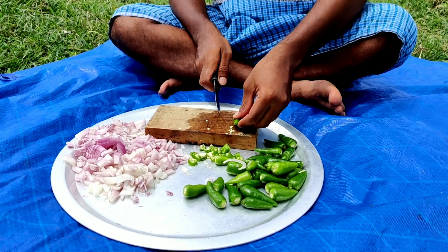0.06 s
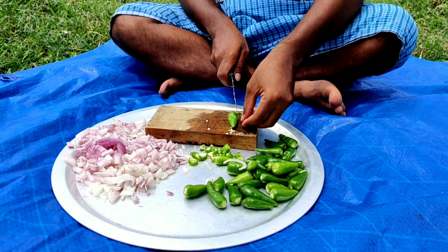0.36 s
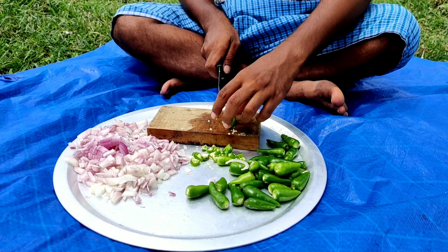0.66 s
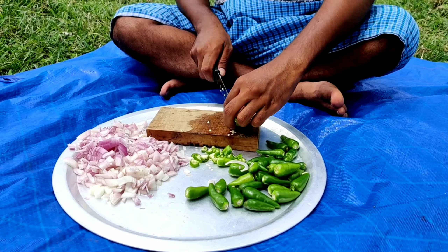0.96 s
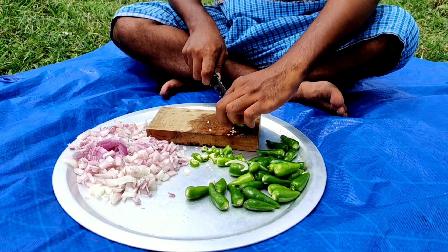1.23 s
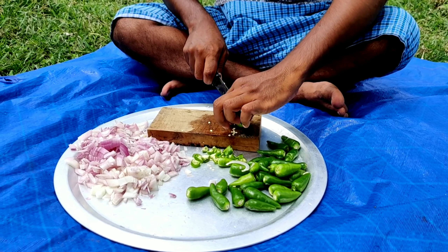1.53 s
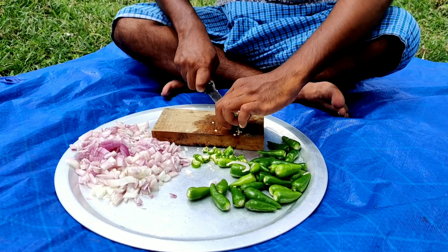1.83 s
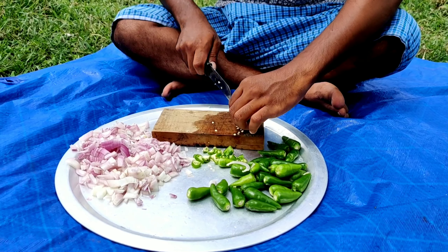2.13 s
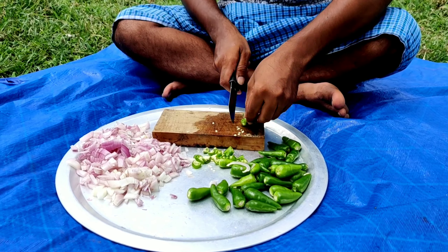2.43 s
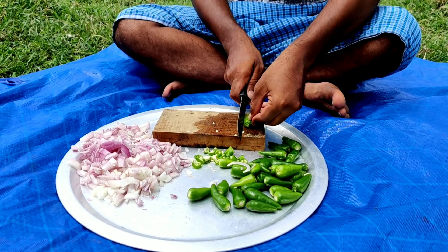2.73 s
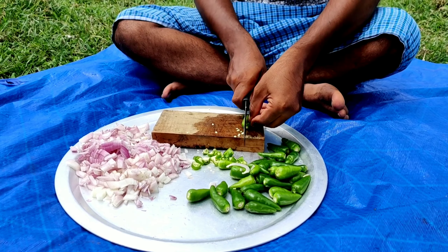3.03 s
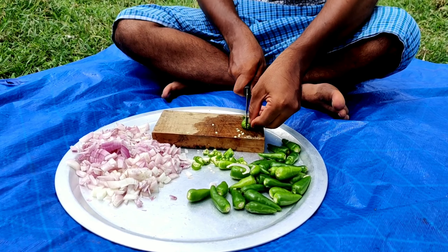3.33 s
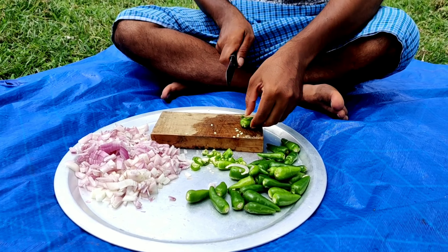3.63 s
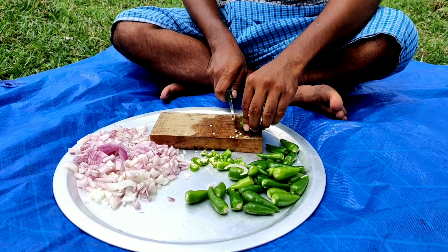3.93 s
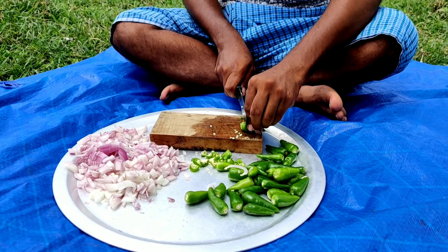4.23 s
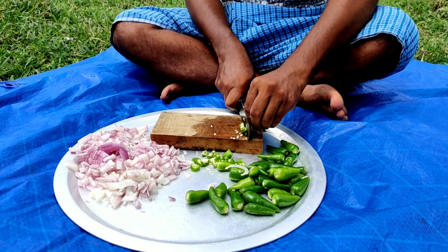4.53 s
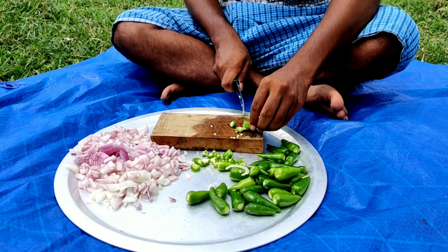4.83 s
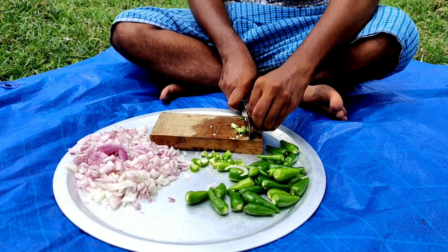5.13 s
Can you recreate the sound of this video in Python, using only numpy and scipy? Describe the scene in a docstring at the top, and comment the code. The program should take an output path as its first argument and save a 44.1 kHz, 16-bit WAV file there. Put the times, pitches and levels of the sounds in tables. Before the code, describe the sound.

Close to the microphone, a knife knocks on a wooden board a handful of times at an uneven pace. Early on, a crow off to the left caws twice, harshly, the second call softer. Then come short, crisp crunches and snaps as the blade cuts through chillies. Small birds whistle faintly in the distance, and gusts of wind rumble on the microphone over a soft outdoor hiss.

```python
"""A knife cuts green chillies on a wooden board, close to the microphone, out on a lawn.
The edge crunches through skin and flesh, and each knock on the wood rings board and blade.
Off to the left a crow caws twice, its pitch kicking fast into a harsh rattle; small birds whistle
farther off. Wind buffets the two microphone ports over a soft hiss of leaves and insects."""
import sys
import numpy as np
from scipy import signal
from scipy.fft import rfft, irfft, next_fast_len
from scipy.io import wavfile
from scipy.ndimage import uniform_filter1d, map_coordinates

SR = 44100
rng = np.random.default_rng(int(sys.argv[2]) if len(sys.argv) > 2 else 0)


def put_to_file(sound):
    """Save the sound as 16-bit audio at rate SR, in the file named by the first command-line argument."""
    columns = np.atleast_2d(sound).T  # one column per channel
    safe = np.clip(columns, -1, 1)
    whole_steps = np.round(safe * 32767)
    wavfile.write(sys.argv[1], SR, whole_steps.astype(np.int16))


N = 236800

# knife meets board, relative levels: (time [s], low knock [dB], middle [dB], high ring [dB], tick [dB])
KNOCKS = [(0.1756, -25, -36.5, -37, -37.5), (1.775, -19.5, -25, -20.5, -39.5), (2.672, -35, -55, -55, -59),
          (3.2626, -23.5, -33, -44, -56), (3.8663, -26.5, -38.5, -19.5, -31.5)]
# modes of board and blade: (frequency [Hz], relative level [dB], t60 [s])
BOARD_MODES = [(429, -1, 0.035), (596, 0, 0.025), (790, -1.5, 0.029), (1000, -14.5, 0.058),
               (1200, -7, 0.0064), (1460, 0, 0.055), (1680, 2, 0.019), (2265, -3, 0.038),
               (2920, -12, 0.031), (3210, -10.5, 0.025), (5370, -2.5, 0.024), (7360, -2, 0.0068)]
# the board as the microphone hears it: (frequency [Hz], left minus right [dB])
BOARD_BALANCE = [(400, 2.5), (2300, 6), (4500, 8), (8000, -8.5), (14000, 0.5)]
# blade going through a pod: (time [s], length [s], skin crackle [dB], flesh crunch [dB])
STROKES = [(3.218, 0.059, -47, -56), (3.328, 0.074, -53.5, -48), (3.384, 0.058, -48.5, -67),
           (4.401, 0.072, -45, -42), (4.537, 0.11, -50.5, -56.5), (5.156, 0.058, -43.5, -46.5),
           (5.29, 0.09, -46.5, -60)]
# skin snapping under the edge: (time [s], crack [dB], pop of the flesh [dB])
SKIN_SNAPS = [(1.538, -37.5, -42.5), (3.121, -41.5, -45), (3.411, -33, -57), (3.421, -33.5, -58),
              (3.513, -41.5, -60), (4.4077, -33, -37), (4.457, -37, -30.5), (5.168, -29.5, -31),
              (5.1835, -25.5, -29), (5.197, -30, -39), (5.212, -44, -33.5)]
# spectra of crackling skin, crunching flesh and a snap: (frequency [Hz], relative density [dB])
SKIN_SPECTRUM = [(1180, -1), (2000, 0), (2720, -6), (3870, -0.5), (5840, -2), (8010, -7), (8730, -9.5),
                 (15500, -5.5)]
FLESH_SPECTRUM = [(200, -54), (400, 1.5), (650, 0.5), (1300, -4.5), (2000, -14), (3500, -38)]
SNAP_SPECTRUM = [(800, -25), (4500, 5), (9000, -7.5), (15000, -1.5)]
# caws: (time [s], length [s], voice [dB], rasp [dB], fade [dB], pitch fall [Hz], fall lateness [power],
# kick briefness [power], beak opening [dB], beak closing [dB], left port lag [s])
CROW_CALLS = [(.858, .372, -20, -35.5, 3, 214.5, 4.6, 1.3, -13.5, 2, 0.000294),
              (2.246, .47, -28.5, -43, 5, 141.2, 2.4, 3.1, -0.5, 22, 0.00032)]
# resonances of the crow's throat and of its high rasp: (frequency [Hz], relative gain [dB])
THROAT_RESPONSE = [(550, -52), (850, -13), (1100, -5.5), (1270, 0.5), (1430, -7.5), (1690, 11.5),
                   (1920, 14), (2210, 11), (2400, 3.5), (2600, -13), (3000, -24), (3600, -70)]
RASP_RESPONSE = [(2200, -53), (2900, -5), (3600, -2.5), (3950, -5), (4380, 7), (4900, 10), (5600, -1),
                 (6300, -3.5), (7400, -4.5), (8200, -5), (10000, -18), (13000, -28)]
# the crow, off to the left: (frequency [Hz], left minus right [dB])
CROW_BALANCE = [(700, -21), (1300, 8), (2400, 2.5), (4400, 4), (8000, -11)]
# rising whistles of a small bird: (time [s], pitch [Hz], level [dB])
RISING_WHISTLES = [(0.286, 3106, -36.5), (4.657, 3113, -33.5)]
# glide of a rising whistle: (time [share of length], pitch [ratio])
RISE_SHAPE = [(0, .77), (0.448, .985), (.8, 1.09), (1, 0.84)]
# high falling whistles: (time [s], length [s], starting pitch [Hz], level [dB])
FALLING_WHISTLES = [(.74, .048, 7200, -52), (1.939, 0.049, 7900, -50.5), (3.028, 0.049, 7000, -56),
                    (3.794, 0.083, 6850, -49.5)]
# far twittering on one note: (time [s], length [s], pitch [Hz], level [dB], warble [share of pitch])
FAR_TWITTERS = [(-.02, 0.03, 3170, -35, .027), (1.38, 0.14, 3500, -52, 0.11),
                (1.977, 0.17, 3280, -50.5, 0.074), (3.518, 0.065, 4760, -46, .035),
                (4.697, 0.87, 3060, -54.5, .022), (4.749, 0.11, 4490, -49, 0.027)]
# buffeting of each port: (time [s], relative level [dB])
LEFT_BUFFETING = [(0, -32.5), (.42, -29), (.85, -21.5), (1.37, -21.5), (1.56, -37), (1.71, -23), (2.0, -38),
                  (2.65, -41), (3.6, -47), (4.38, -42), (4.68, -36), (5.37, -35.5)]
RIGHT_BUFFETING = [(0, -26.5), (.22, -28), (.38, -32), (.58, -13), (.7, -10), (.76, -26), (1.7, -35),
                   (1.85, -48), (2.55, -40.5), (3.2, -50.5), (4.05, -43.5), (4.42, -39.5), (4.54, -21.5),
                   (4.79, -24.5), (4.86, -38.5), (4.96, -18.5), (5.2, -24), (5.37, -36)]
# deep rumble and brighter flutter at a port: (frequency [Hz], relative density [dB])
RUMBLE_SPECTRUM = [(11, 8.5), (18, 1.5), (61, 3.5), (151, -11.5), (259, -35.5), (442, -34), (601, -46),
                   (648, -46), (700, -41), (910, -78), (1540, -120)]
FLUTTER_SPECTRUM = [(60, 0), (190, 13.5), (400, -9.5), (700, -31), (2000, -44), (6000, -60)]
# strong gusts break into eddies on the right port: (time [s], level [dB], half width [s])
RIGHT_EDDIES = [(0.506, -9, 0.0021), (0.532, -19.5, 0.00047), (0.576, -3.5, 0.002), (0.6646, -7.5, 0.0011),
                (.674, -7.5, 0.001), (.685, -3.5, 0.0026), (0.6935, -9.5, 0.00092), (.705, -9, 0.0021),
                (0.709, 1.5, 0.0011), (4.697, -13.5, .0018)]
# ambience of the lawn: (time [s], relative level [dB])
AMBIENCE_LEVEL = [(0.0, -55), (0.66, -55), (1.05, -52.5), (1.2, -54.5), (2.68, -55), (2.81, -56.5),
                  (4.4, -58), (4.56, -54), (5.37, -53.5)]
# its spectrum: (frequency [Hz], relative density [dB])
AMBIENCE_SPECTRUM = [(18, -41), (30, 1.5), (97, -4.5), (130, -5.5), (208, -7), (237, -12), (399, -18),
                     (443, -20.5), (656, -25.5), (996, -24), (1080, -24), (1230, -24.5), (3680, -24),
                     (7650, -34), (15500, -36)]
# its likeness at the two ports: (frequency [Hz], correlation [-1 to 1])
AMBIENCE_LIKENESS = [(60, 1), (240, 1), (950, 0.013), (3770, -0.012), (15000, -0.078)]
# its lean to one side: (frequency [Hz], left minus right [dB])
AMBIENCE_BALANCE = [(60, -1.5), (180, 1.5), (550, 2), (1650, 2.0), (4970, 0), (15000, -4.5)]
# its flicker: (frequency [Hz], rms depth [dB])
AMBIENCE_FLICKER = [(500, 0.74), (3500, 2.74), (9000, 0.64)]
# decay of the scatter from trees and walls: (frequency [Hz], t60 [s])
YARD_DECAY = [(300, 0.33), (2000, 0.48), (9000, 0.049)]

CUT_ATTACK_S, CUT_RELEASE_S = 0.011, .014  # the edge bites; the tearing dies away
CAW_TOP_HZ, SCOOP_HZ, SCOOP_S = 589.6, 164.6, .041  # each caw scoops up towards its top pitch
CAW_ATTACK_S, CAW_RELEASE_S, CAW_EDGE_DB = 0.058, 0.027, 27  # the voice starts and ends this far down
FADE_AT, FADE_WIDTH = 0.61, 0.18  # where the voice tires and how gradually, as shares of the call
KICKS_PER_S, RASP_DB_PER_HZ = 79.7, .06  # the rasp weakens as the pitch slackens
BEAK_HZ, BEAK_WIDTH_HZ, BEAK_OPEN_DB = 2120, 135, 7.5  # overtones above this pass while the beak is open
RISE_S, FALL_OCTAVES_PER_S = 0.054, 10  # the small birds' whistles
SWIRLS_PER_S, SWIRL_HALF_WIDTH_S, SWIRL_DB = 14, 0.0027, 4  # lesser eddies on each port
AMBIENCE_GAIN_DB, BAND_LIMIT_HZ = 15.5, 15800


def knife_knocks():
    """Each blow rings the board's modes; where and how the edge lands sets their strengths."""
    out, t = np.zeros(N), np.arange(SR // 5) / SR
    hz, mode_db, t60 = np.transpose(BOARD_MODES)[:, :, None]
    polarity = (-1) ** np.arange(len(hz))[:, None]  # neighbouring modes swing opposite ways
    rattle_band = signal.butter(2, [350, 2200], "band", fs=SR, output="sos")
    for s, low, middle, high, tick in KNOCKS:
        blow_db = along([(650, low), (1500, middle), (2300, high), (3400, tick)], hz)
        strength = amp(mode_db + blow_db + rng.normal(0, 1, hz.shape) + 3.5)
        ring = np.sum(polarity * strength * amp(-60 * t / t60) * np.sin(2 * np.pi * hz * t), axis=0)
        crack = amp(tick - 4 - 60 * t / 0.03) * rng.standard_normal(len(t))
        rattle = unit(signal.sosfilt(rattle_band, rng.standard_normal(len(t))))  # board jars on its tray
        add(out, s, ring + crack + amp(low - 5.5 - 60 * t / 0.041) * rattle)
    return placed(out, BOARD_BALANCE) + amp(-25) * yard(out)


def knife_cuts():
    """The pod's skin crackles and its flesh crunches; now and then the skin snaps and the pod pops."""
    skin, flesh, cracks, pops = np.zeros((4, N))
    for s, length, skin_db, flesh_db in STROKES:
        t = clock() - s
        stroke = np.clip(t / CUT_ATTACK_S, 0, 1) * np.exp(-np.maximum(t - length, 0) / CUT_RELEASE_S)
        skin += amp(skin_db) * stroke
        flesh += amp(flesh_db) * stroke
    t = np.arange(SR // 20) / SR
    for s, crack_db, pop_db in SKIN_SNAPS:
        add(cracks, s, amp(crack_db - 60 * t / 0.019))
        add(pops, s, amp(pop_db - 60 * t / 0.043))
    snaps = cracks * coloured(rng.standard_normal(N), SNAP_SPECTRUM)
    snaps += pops * coloured(rng.standard_normal(N), FLESH_SPECTRUM)
    tearing = unit(amp(3 * wobble(180)))  # the skin gives in small jerks
    crackle = skin * coloured(cell_bursts(rate=4300, spread_db=4.5), SKIN_SPECTRUM)
    scatter = amp(3) * skin * tearing * coloured(rng.standard_normal((2, N)), SKIN_SPECTRUM)
    crunch = flesh * coloured(cell_bursts(rate=990, spread_db=1.5), FLESH_SPECTRUM)
    return placed(crackle + crunch + snaps + scatter, BOARD_BALANCE)


def cell_bursts(rate, spread_db):
    """Cells of uneven size bursting at random, rate a second."""
    clicks = (rng.random(N) < rate / SR) * rng.choice([-1, 1], N)
    return clicks * amp(spread_db * rng.standard_normal(N))


def crow():
    """Off to the left, each caw scoops up, holds, then tires: it fades and its pitch falls ever faster."""
    out = np.zeros((2, N))
    for s, length, voice_db, rasp_db, fade_db, fall_hz, lateness, *timbre, lag in CROW_CALLS:
        t = np.clip(clock() - s, 0, length)
        progress = t / length
        f0 = CAW_TOP_HZ - SCOOP_HZ * np.exp(-(t / SCOOP_S) ** 2) - fall_hz * progress ** lateness
        effort = np.clip(np.minimum(t / CAW_ATTACK_S, (length - t) / CAW_RELEASE_S), 0, 1)
        gate = np.minimum(10 * effort, 1)
        edge_db = CAW_EDGE_DB * (effort - 1)
        tired_db = fade_db * (1 + np.tanh((progress - FADE_AT) / FADE_WIDTH)) / 2
        slack_db = RASP_DB_PER_HZ * (CAW_TOP_HZ - f0)
        call = caw(f0, gate, voice_db + edge_db - tired_db, rasp_db + edge_db / 2 - slack_db, *timbre)
        out += placed(call, CROW_BALANCE, lag) + amp(-22) * yard(call[0])
    return out


def caw(f0, gate, voice_db, rasp_db, briefness, beak_db, closing_db):
    """Quick upward kicks of pitch sweep the overtones across the throat's resonances: a harsh rattle."""
    on = gate > 0
    progress = np.linspace(0, 1, on.sum())
    beat = 2 * np.pi * np.cumsum(KICKS_PER_S * (1 + .03 * wobble(40))) / SR
    kick = np.abs(np.cos(beat / 2)) ** (2 * briefness) * (1 + .15 * wobble(80))
    swing = np.interp(f0, [470, 545], [.015, .135])  # the kicks grow with effort
    pitch = f0 * (1 + swing * (kick - kick.mean()) + .005 * wobble(45) + .003 * wobble(700))
    strength = gate * (1 - .25 * kick) * (1 + .2 * np.sin(beat))  # thins on a kick, swells as it drops
    overtone_hz = np.arange(1, 23)[:, None] * pitch[on]
    overtones = np.cos(2 * np.pi * np.cumsum(overtone_hz, axis=1) / SR)
    resonance_hz = 5700 + 1400 * np.sin(2.5 * progress)  # rises as the beak opens, then sinks
    lift = amp(5 * np.exp(-((overtone_hz - resonance_hz) / 450) ** 2))
    treble = np.clip((overtone_hz - BEAK_HZ) / BEAK_WIDTH_HZ, 0, 1)
    beak_gain = amp((BEAK_OPEN_DB - closing_db * progress ** 3) * treble)
    pulses, bright = np.zeros((2, N))
    pulses[on] = (beak_gain * overtones).sum(axis=0)
    bright[on] = (lift * overtones).sum(axis=0)
    hiss = rng.standard_normal((2, N))
    shaped = lambda source, spectrum: coloured(strength * source, spectrum) * np.sqrt(np.mean(on))
    # an open beak lifts the upper resonance
    throat = [(hz, db + beak_db * np.clip(np.log2(hz / 1700), 0, 1)) for hz, db in THROAT_RESPONSE]
    voice = shaped(pulses, throat) + amp(-19) * shaped(hiss, throat)
    rasp = shaped(bright, RASP_RESPONSE) + amp(-12) * shaped(hiss, RASP_RESPONSE)
    return amp(voice_db) * voice + amp(rasp_db) * rasp


def small_birds():
    """Twitters, rising whistles and falling whistles, blurred by distance."""
    out = sum(whistle(*row) for row in FAR_TWITTERS)
    for s, hz, db in RISING_WHISTLES:
        glide = np.interp((clock() - s) / RISE_S, *np.transpose(RISE_SHAPE))
        out += whistle(s, RISE_S, hz * glide, db, warble=0.014)
    for s, length, hz, db in FALLING_WHISTLES:
        glide = 2 ** (-FALL_OCTAVES_PER_S * np.clip(clock() - s, 0, length))
        out += whistle(s, length, hz * glide, db, warble=.025)
    return out + amp(-7) * yard(out)


def whistle(s, length, hz, db, warble):
    """One thin note that swells and fades, its pitch a little unsteady."""
    swell = np.sin(np.pi * np.clip((clock() - s) / length, 0, 1))
    pitch = hz * (1 + warble * wobble(400))
    return amp(db) * swell * np.sin(2 * np.pi * np.cumsum(pitch) / SR)


def wind_on_microphone():
    """Each port has its own buffeting; strong gusts turn into a brighter flutter and eddies thump."""
    buffet_db = np.array([curve(LEFT_BUFFETING), curve(RIGHT_BUFFETING)])
    gust = amp(buffet_db + 1.74 * np.array([wobble(9), wobble(21)]))
    rumble = gust / np.hypot(1, gust / .13)  # the deep rumble levels off in strong gusts
    out = amp(2.2) * rumble * coloured(rng.standard_normal((2, N)), RUMBLE_SPECTRUM)
    out += amp(2.5) * gust ** 2 * coloured(rng.standard_normal((2, N)), FLUTTER_SPECTRUM)
    swirls = amp(SWIRL_DB) * rumble * (rng.random((2, N)) < SWIRLS_PER_S / SR)
    swirl_shape = eddy(np.arange(-SR // 20, SR // 20) / SR, SWIRL_HALF_WIDTH_S)
    out += signal.fftconvolve(swirls, swirl_shape[None], "same", axes=1)
    out[1] += sum(amp(db) * eddy(clock() - s, width) for s, db, width in RIGHT_EDDIES)
    return out


def eddy(t, width):
    """The pressure of an eddy passing a port: a push, then a pull."""
    u = t / width
    return -3 * u / (1 + u ** 2) ** 2


def lawn_ambience():
    """Leaves, insects and far-off life: a soft, shifting hiss all around the microphone."""
    def mid_side_gains(hz):
        angle = np.arccos(np.clip(along(AMBIENCE_LIKENESS, hz), -1, 1)) / 2
        return amp(along(AMBIENCE_SPECTRUM, hz)) * [np.cos(angle), np.sin(angle)]
    mid, side = filtered(rng.standard_normal((2, N)), mid_side_gains)
    hz, _, bands = signal.stft(np.array([mid + side, mid - side]), SR, nperseg=512)
    flicker = uniform_filter1d(rng.standard_normal(bands.shape[1:]), size=6, axis=0)  # across frequency
    flicker = unit(uniform_filter1d(flicker, size=16, axis=1))  # and over time
    bands *= amp(along(AMBIENCE_FLICKER, hz)[:, None] * flicker)
    hiss = unit(signal.istft(bands, nperseg=512)[1][:, :N])
    return placed(amp(curve(AMBIENCE_LEVEL) + AMBIENCE_GAIN_DB) * hiss, AMBIENCE_BALANCE)


def yard(x):
    """Scatter from trees and walls; each frequency dies at its own speed."""
    hz, t, bands = signal.stft(rng.standard_normal((2, SR // 2)), SR, nperseg=256)
    tail = signal.istft(bands * amp(-60 * t / along(YARD_DECAY, hz)[:, None]), SR, nperseg=256)[1]
    return signal.fftconvolve(x[None], tail / np.linalg.norm(tail[0]), axes=1)[:, :N]


def placed(x, balance, lag=0):
    """x at the two ports: a level difference by frequency, the left port later by lag seconds."""
    sides = np.array([[.5], [-.5]])
    return filtered(x, lambda hz: amp(sides * along(balance, hz)) * np.exp(-2j * np.pi * hz * lag * sides))


def amp(db):
    """Decibels to gain."""
    return 10 ** (np.asarray(db) / 20)


def unit(x):
    """x at rms 1."""
    return x / np.sqrt(np.mean(x ** 2) + 1e-20)


def clock():
    """The time of each sample."""
    return np.arange(N) / SR


def along(points, hz):
    """(frequency, value) points read at hz on a log axis."""
    f, v = np.transpose(points)
    return np.interp(np.log(hz + 1), np.log(f + 1), v)


def curve(points):
    """(time, value) points read at each sample."""
    return np.interp(clock(), *np.transpose(points))


def wobble(rate):
    """A smooth random curve, rate knots a second."""
    return map_coordinates(rng.standard_normal(int(N * rate / SR) + 4), [clock() * rate])


def filtered(x, response):
    """x through a frequency response."""
    size = next_fast_len(N + SR // 4)
    return irfft(rfft(x, size) * response(np.fft.rfftfreq(size, 1 / SR)), size)[..., :N]


def coloured(x, spectrum):
    """x shaped by a spectrum, at rms 1."""
    return unit(filtered(x, lambda hz: amp(along(spectrum, hz))))


def add(track, s, sound):
    """Mix a sound into a track from time s."""
    part = track[..., round(s * SR):][..., :sound.shape[-1]]
    part += sound[..., :part.shape[-1]]


def scene():
    """The knife close by, the birds beyond it, wind on the microphone and the lawn all around."""
    return knife_knocks() + knife_cuts() + crow() + small_birds() + wind_on_microphone() + lawn_ambience()


def record(dry):
    """The recorder clips at full scale and keeps nothing above its band limit."""
    return filtered(np.clip(dry, -1, 1), lambda hz: hz < BAND_LIMIT_HZ)


dry = scene()
out = record(dry)
put_to_file(out)
```